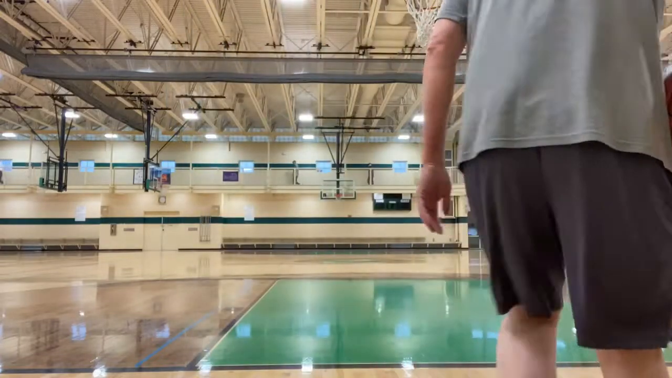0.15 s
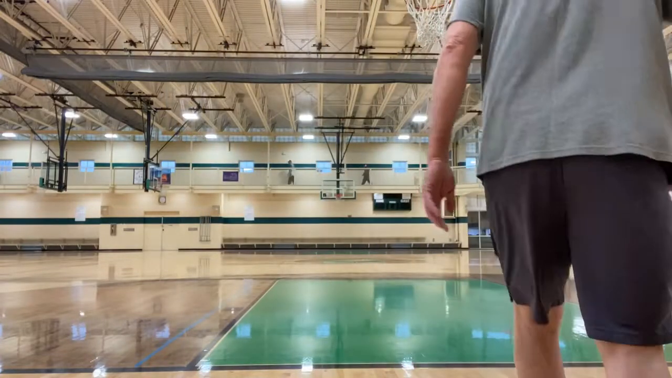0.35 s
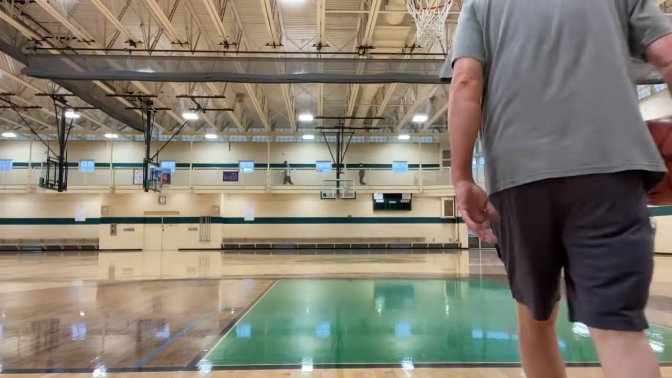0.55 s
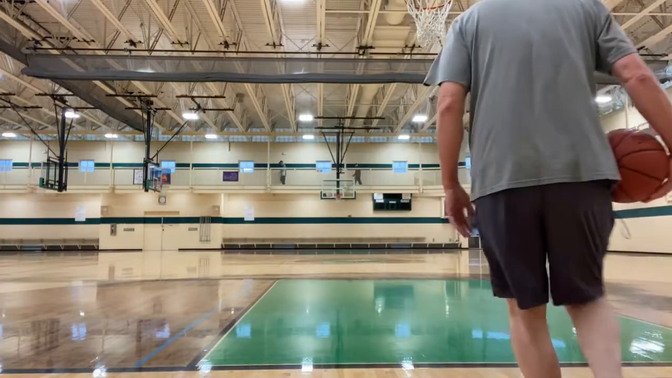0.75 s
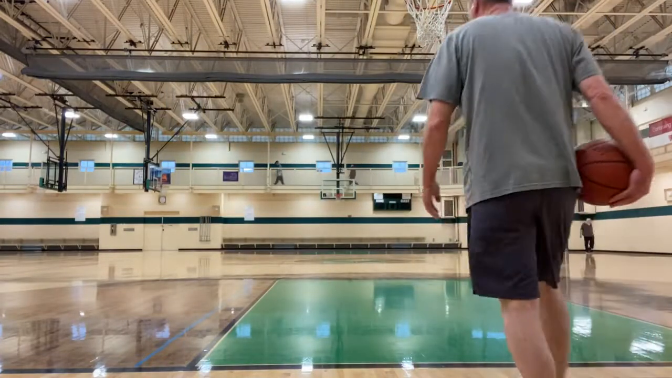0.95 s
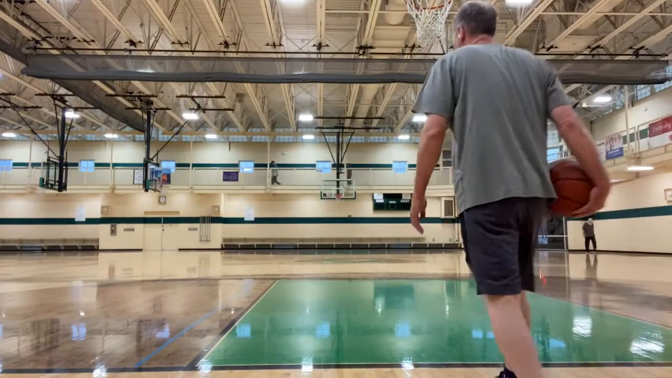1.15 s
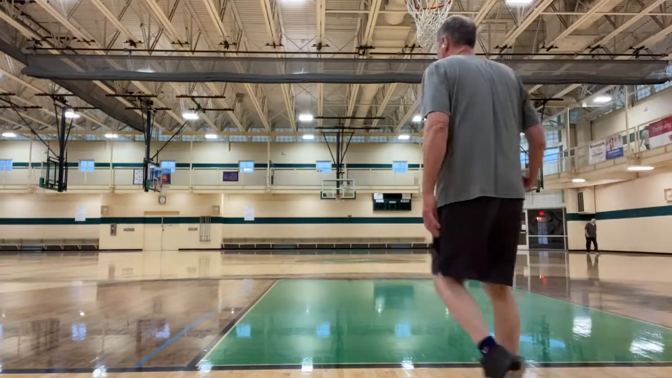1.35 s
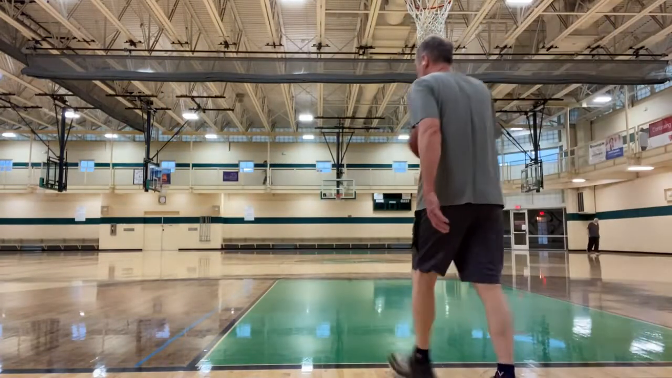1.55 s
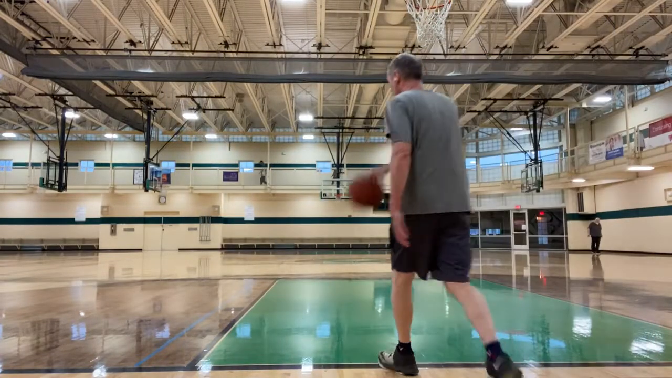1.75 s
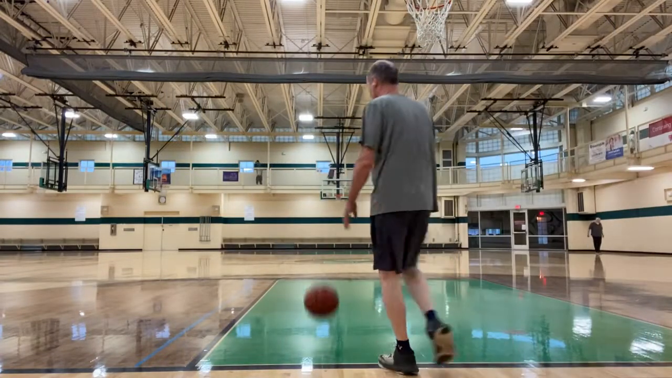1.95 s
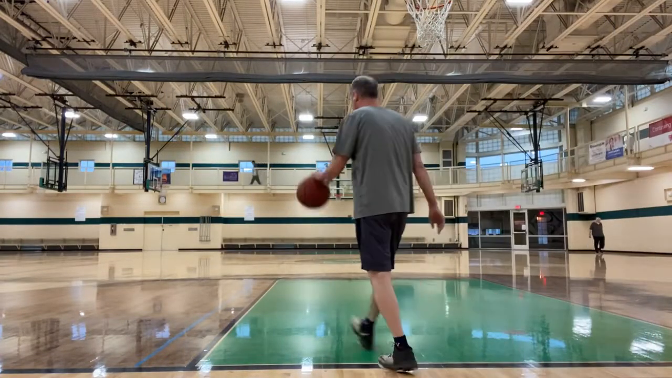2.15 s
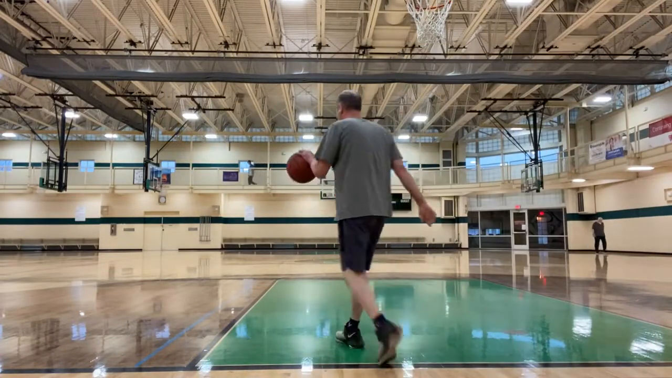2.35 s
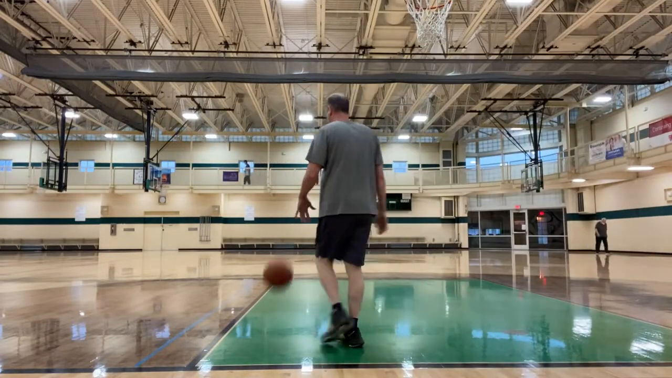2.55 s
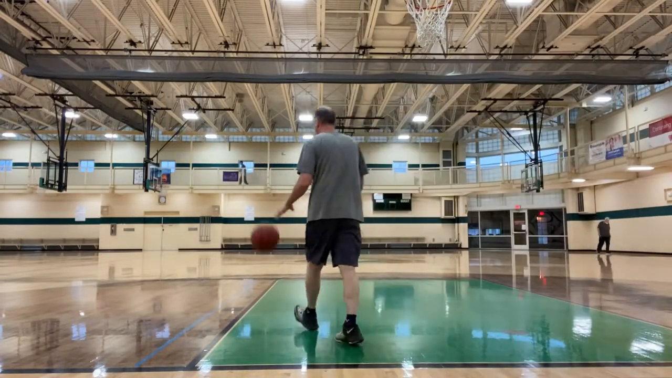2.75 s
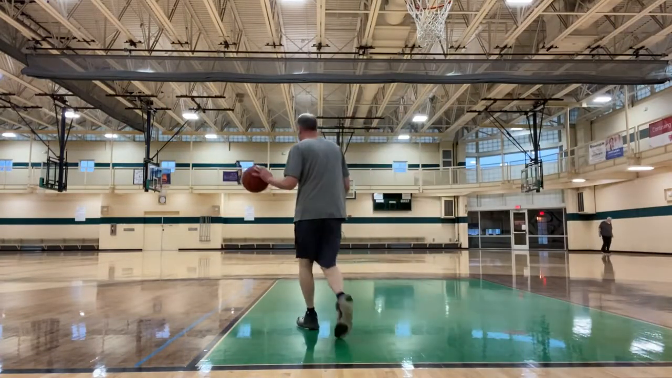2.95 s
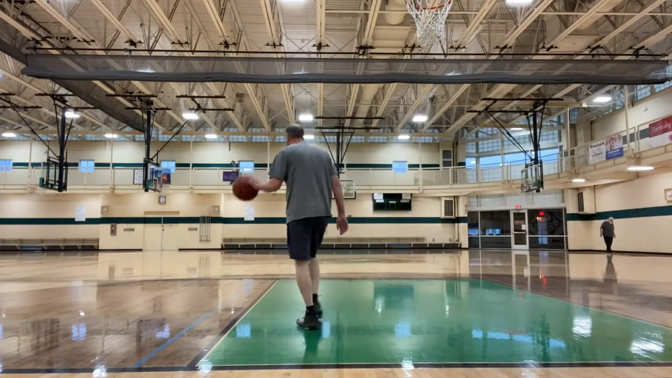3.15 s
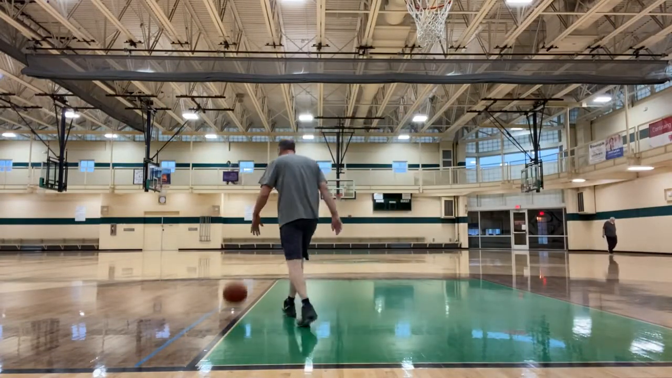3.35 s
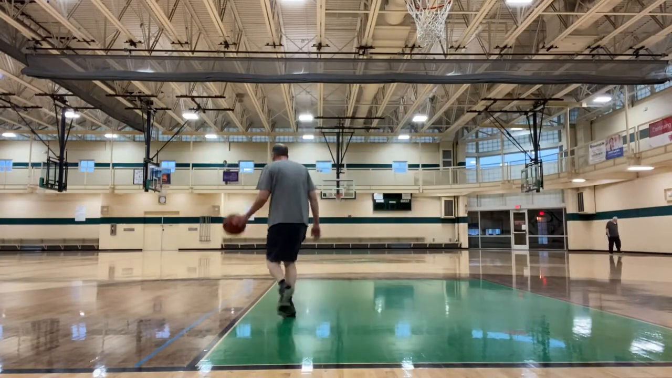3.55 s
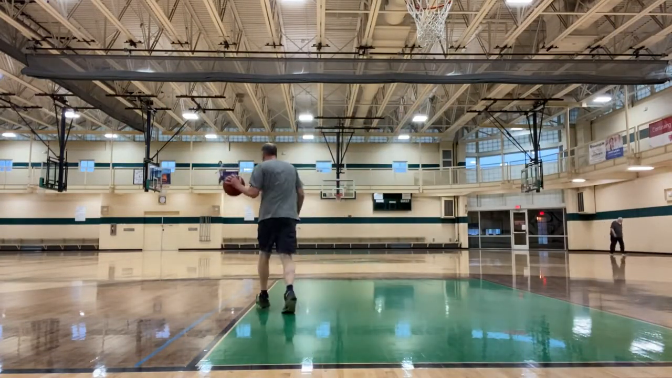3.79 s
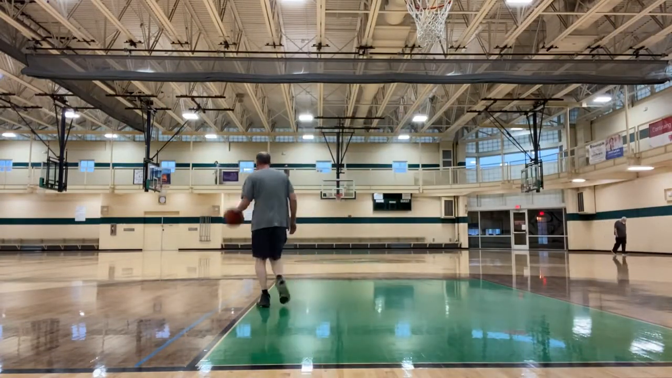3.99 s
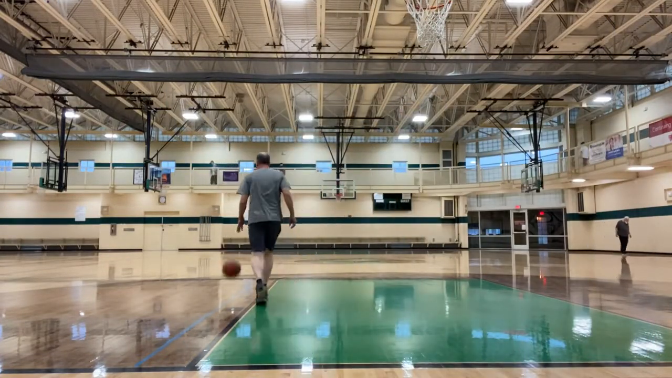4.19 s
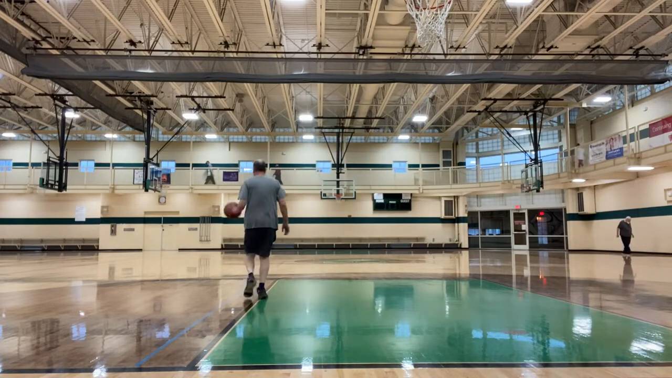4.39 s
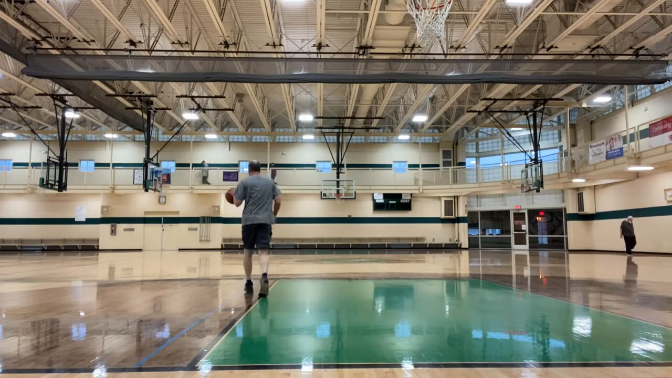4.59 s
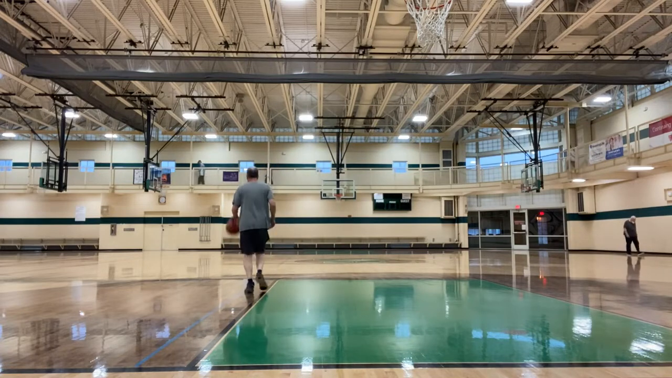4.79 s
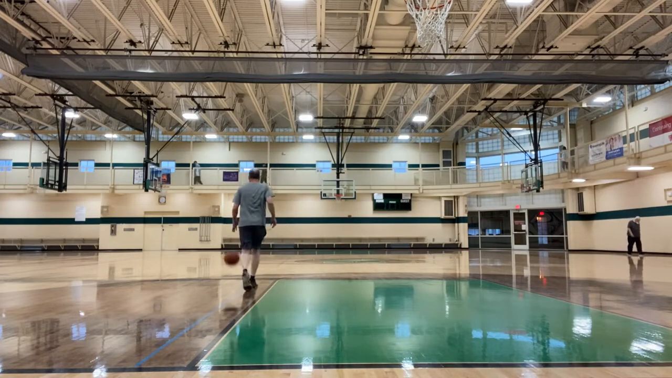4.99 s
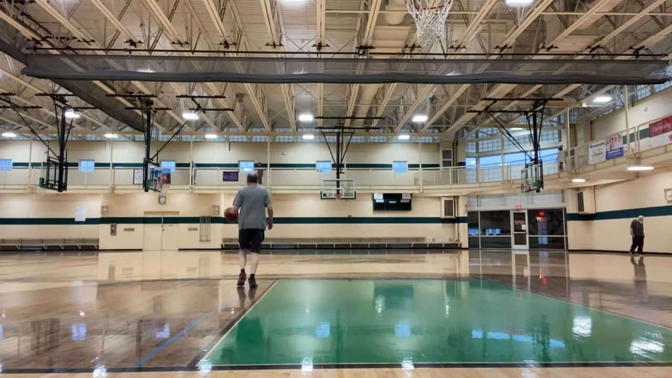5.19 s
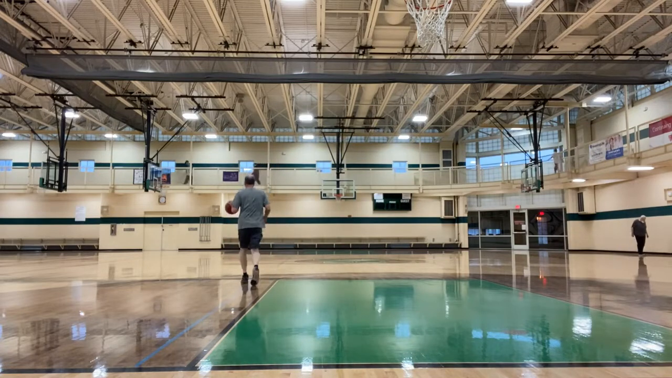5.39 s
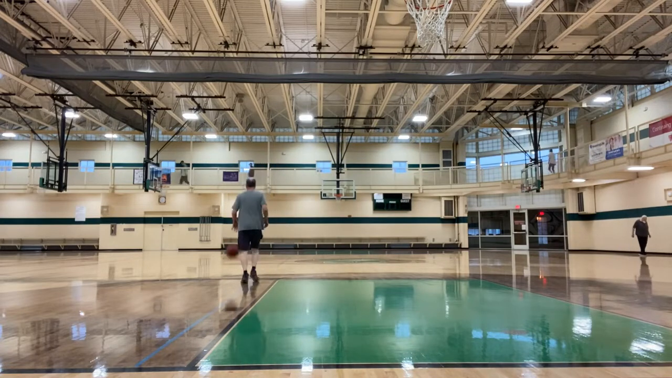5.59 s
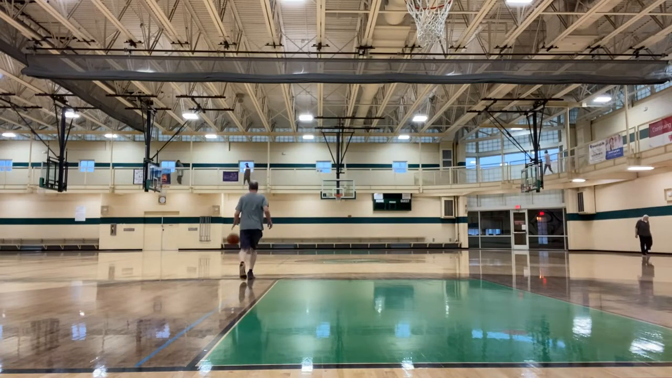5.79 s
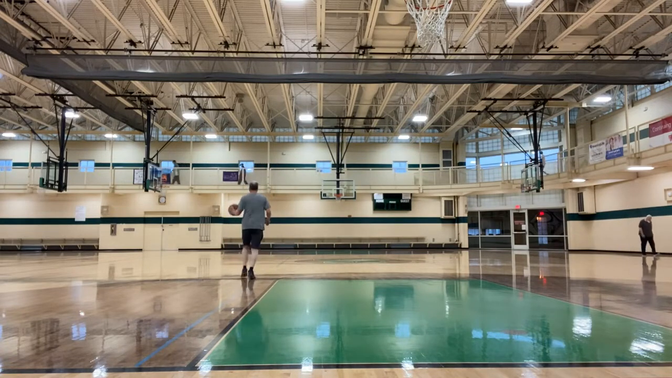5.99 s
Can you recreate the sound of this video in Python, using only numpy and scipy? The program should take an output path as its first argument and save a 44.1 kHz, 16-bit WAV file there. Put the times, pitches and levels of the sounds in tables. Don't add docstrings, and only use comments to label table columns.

```python
import sys
import numpy as np
from scipy import signal
from scipy.fft import rfft, irfft, next_fast_len
from scipy.io import wavfile
from scipy.ndimage import uniform_filter1d

SR = 44100
rng = np.random.default_rng(int(sys.argv[2]) if len(sys.argv) > 2 else 0)


def level_to_linear(level):
    exponent = np.asarray(level, float) / 20
    return 10 ** exponent


def digitize_waveform(pressure):
    field = np.atleast_2d(pressure).T
    bounded = np.clip(field, -1, 1)
    quanta = np.round(bounded * 32767).astype(np.int16)
    wavfile.write(sys.argv[1], SR, quanta)


N = 265923

# [t/s, slap level/dB, ball ring level/dB, board knock level/dB, floor thump level/dB]
BOUNCES = [
    (2.0133, -7, -14, -12, -9.5),
    (2.715, -7, -12.5, -19.5, -11.5),
    (3.4775, -9, -12, -18, -14),
    (4.2498, -15, -18, -17, -14.5),
    (5.014, -10.5, -20.5, -21, -13),
    (5.7491, -16, -16, -25, -16),
]
# [f/Hz, level/dB]
MID_COLOUR = [(25, 4.5), (6000, -1), (7200, -4.5), (8500, -0.5), (11500, -9), (12300, -18), (13300, -12),
              (13900, -11), (15700, -6), (16200, -18), (16900, -42)]


def evened(x):
    return x / np.sqrt(np.mean(x ** 2) + 1e-20)


def read(points, hz):
    f, value = np.transpose(points)
    return np.interp(np.log(hz + 1), np.log(f + 1), value)


def add(mix, s, sound):
    part = mix[round(s * SR):][:len(sound)]
    part += sound[:len(part)]


def diffuse(gain):
    # [f/Hz, level/dB]
    side_colour = [(25, -4), (7000, -0.5), (8700, -10.5), (9400, -29), (10200, -22), (10900, -11.5),
                   (13000, -8), (14500, -5), (15200, -19.5), (16900, -45)]
    # [f/Hz, side minus mid level/dB]
    width = [(60, -21), (100, -8.5), (160, -3), (270, -1.5), (450, 1), (740, 5), (1200, 2), (2000, 2),
             (3300, -1.5), (5500, 2), (9000, 7), (15000, -1.5)]
    size = next_fast_len(N)
    hz = np.fft.rfftfreq(size, 1 / SR)
    re, im = rng.standard_normal((2, 2, len(hz)))
    ports = level_to_linear(np.array([read(MID_COLOUR, hz), read(side_colour, hz) + read(width, hz)]))
    mid, side = irfft((re + 1j * im) * gain(hz) * ports, size)[:, :N]
    return np.array([mid + side, mid - side]) / np.sqrt(np.mean(mid ** 2))


def swell(t, hz, peak_s, order, turn, glide=0.):
    u = t / peak_s
    cycles = hz * (t - peak_s) * (1 + glide * (u - 1) / 2) + turn
    return (u * np.exp((1 - u ** 2) / 2)) ** order * np.cos(2 * np.pi * cycles)


def slap(seconds, colour_db):
    hz = np.fft.rfftfreq(512, 1 / SR)
    delay = 0.001165 + 0.58 * seconds * np.log2(16000 / (hz + 1000))
    later, size = rng.random((2, 4, 1))
    extra = (2 * size - 1) * np.exp(-2j * np.pi * hz * 4 * seconds * later)
    clicks = 1 + .4 * extra.sum(0)
    phase = 2 * np.pi * np.cumsum(delay) * hz[1]
    burst = irfft(clicks * level_to_linear(colour_db(hz)) * np.exp(-1j * phase))
    return burst / abs(burst).max()


def air():
    # [f/Hz, level per Hz/dB]
    vent = [(100, -8), (131, -20.5), (154, -24), (280, -22.5), (634, -26.5), (1180, -36), (2600, -39.5),
            (4500, -48), (7000, -64), (9500, -63.5), (12000, -69.5), (15000, -70), (17000, -89)]
    t = np.arange(N) / SR
    drift = evened(sum(np.sin(2 * np.pi * (f * t + rng.random())) / np.sqrt(f)
                       for f in np.geomspace(.3, 12, num=16)))
    hiss = diffuse(lambda f: level_to_linear(read(vent, f)) * f ** 4 / (f ** 4 + 132.0 ** 4))
    return level_to_linear(-29.5 - 9.0 + 1.0 * drift) * hiss


def rustle():
    # [t/s, level/dB, length/s]
    brushes = [(0.0, -67, 0.046), (.085, -66, .06), (.25, -80, .05), (0.414, -69, 0.033), (.53, -72, .03),
               (.65, -71, 0.072), (0.896, -70, 0.062), (1.02, -63.5, 0.12), (1.13, -66, 0.083),
               (1.202, -64, 0.069), (1.47, -66, .02), (1.57, -71, .06), (1.774, -67, 0.078),
               (1.876, -63.5, 0.074), (3.25, -74, .03), (3.865, -61.5, 0.07), (4.507, -62, .025)]
    rise_share = 0.21
    t = np.arange(N) / SR
    power = level_to_linear(-2 * 79.0)
    for s, db, seconds in brushes:
        rise = ((s - t) / (rise_share * seconds)) ** 2
        fall = 2 * (t - s) / seconds
        power = power + level_to_linear(2 * db) * np.exp(-np.where(t < s, rise, fall))
    grain = level_to_linear(2.5 * evened(uniform_filter1d(rng.standard_normal(N), size=150)))
    hiss = diffuse(lambda f: level_to_linear(-6 * (np.log2((f + 1) / 8500) / 0.83) ** 2))
    return np.sqrt(power) * evened(grain) * hiss


def steps():
    # [t/s, level/dB, f/Hz]
    footfalls = [(.03, -28, 113), (.09, -27, 60), (0.268, -32, 59), (0.489, -30.5, 120),
                 (0.619, -26.5, 65.6), (0.788, -24, 61), (1.222, -27, 59), (1.502, -31.5, 119),
                 (1.74, -30, 68), (1.845, -32, 76), (2.076, -15, 106), (2.272, -15, 71), (2.33, -15, 105),
                 (2.39, -14.5, 71.4), (2.512, -22, 70.6), (2.772, -8.5, 96), (2.939, -25, 67),
                 (3.058, -25, 99), (3.531, -14, 96.6), (3.901, -32, 74.5), (4.419, -22, 113),
                 (4.72, -26.5, 114), (4.858, -44, 68), (5.079, -27, 97), (5.148, -28, 131),
                 (5.249, -20.5, 101), (5.539, -21, 118), (5.63, -27, 71.5), (5.812, -26, 101)]
    rise_cycles = 3.5
    out = np.zeros(N)
    for (s, db, hz), turn in zip(footfalls, rng.random(len(footfalls))):
        peak_s = min(rise_cycles / hz, s)
        t = np.arange(0, 3 * peak_s, 1 / SR)
        add(out, s - peak_s, level_to_linear(db + 1.5) * swell(t, hz, peak_s, order=2, turn=turn))
    return out


def sway():
    # [low lobe level/dB, high lobe level/dB, far wall return t/s,
    # low return level/dB, high return level/dB]
    booms = [(-20, -21.5, .28, -21, -36), (-25, -20.5, 0.3, -31, -42), (-26, -23.5, 0.23, -28.5, -27.5),
             (-34.5, -26, 0.29, -27, -44), (-27.5, -20.5, 0.31, -23, -23),
             (-26.5, -27.5, 0.19, -24.5, -24.5)]
    rest_low_db, rest_high_db = -34.5, -37.5
    build_s, boom_t60_s, return_s = 0.032, 4.5, 0.057
    shudder_db, shudder_t60_s = 14.5, 0.32
    since = np.clip(np.arange(N) / SR - np.array(BOUNCES)[:, :1], 0, None)
    low_db, high_db, wall_s, back_low_db, back_high_db = np.transpose(booms)[:, :, None]
    boom = level_to_linear(-120 * since / boom_t60_s) + level_to_linear(2 * shudder_db - 120 * since / shudder_t60_s)
    boom *= (1 - np.exp(-(since / build_s) ** 2)) ** 2
    back = np.exp(-((since - wall_s) / return_s) ** 2)

    def level(rest_db, db, back_db):
        return np.sqrt(level_to_linear(2 * rest_db) + (level_to_linear(2 * db) * boom + level_to_linear(2 * back_db) * back).sum(0))

    def lobe(centre_hz, octaves):
        return diffuse(lambda f: level_to_linear(-6 * (np.log2((f + 1) / centre_hz) / octaves) ** 2))

    def steady(x):
        return evened(x / uniform_filter1d(x.mean(0) ** 2, size=2200) ** 0.12)

    low = steady(lobe(67.2, 0.33))
    high = steady(lobe(113.2, 0.42))
    out = level(rest_low_db, low_db, back_low_db) * low
    out += level(rest_high_db, high_db, back_high_db) * high
    return out + level_to_linear(-41) * lobe(42, 0.62)


def hall():
    # [f/Hz, starting level/dB, t60/s, build-up/s]
    bands = [(171.5, -22, 3.16, 0.0072), (386, -32.5, 2.53, 0.004), (633, -35.5, 1.06, 0.0009),
             (950, -41.5, 1.5, 0.0056), (1450, -38.5, 2.64, 0.0079), (2200, -42.5, 2.7, 0.01),
             (2960, -42.5, 1.8, 0.0085), (5000, -46, 1.66, 0.00061), (7000, -55, 1.4, 0.013),
             (9640, -49, 0.8, 0.033), (11800, -62, 0.49, 0.0066), (15000, -63, .45, .005)]
    # [level/dB, brightness/(dB per octave), ring of the ball/dB,
    # its lowest ring/dB, strength of early reflections]
    answers = [(-2.5, 0.5, -4, 2, 24), (-3, 1, 3, -6, 17), (-6, 1, 4, -2, 6.5), (-6, 0, -0.5, 3.5, 3.4),
               (-2.5, 1.5, 1, -4.5, 0.59), (-6.5, 0.5, -1, 4, 0.92)]
    early_above_hz = 175
    out, centres = np.zeros((2, N)), np.array(bands)[:, 0]
    t = np.arange(0, N / SR + .01, .001)
    since = np.clip(t - np.array(BOUNCES)[:, :1], 0, None)
    answer_db, bright_db, ring_db, low_ring_db, early = np.transpose(answers)[:, :, None]
    clumps = evened(uniform_filter1d(rng.standard_normal((len(t), len(bands))), size=12, axis=0))
    for k, (centre, db, t60, build) in enumerate(bands):
        share = np.c_[np.r_[130, centres, 16800], np.r_[0, np.arange(len(bands)) == k, 0]]
        start_db = answer_db + bright_db * np.log2(centre / 1500)
        start_db += ring_db * np.exp(-np.log2(centre / 2300) ** 2)
        start_db += low_ring_db * np.exp(-(np.log2(centre / 1450) / 0.3) ** 2)
        power = level_to_linear(2 * (start_db - 60 * since / t60)) * (1 - np.exp(-since / build)) ** 2
        treble = centre ** 2 / (centre ** 2 + early_above_hz ** 2)
        reflections = early * treble * np.exp(-since / 0.02)
        far_wall = 0.11 * np.exp(-((since - .15) / 0.027) ** 2)
        power *= 1 + reflections + far_wall
        level = level_to_linear(db + 2.14 * clumps[:, k]) * np.sqrt(power.sum(0))
        out += np.interp(np.arange(N) / SR, t, level) * diffuse(lambda hz: np.sqrt(read(share, hz)))
    return out


def ticks():
    # [t/s, level/dB, brightest f/Hz]
    clicks = [(0.4095, -45, 7000), (1.1277, -33, 8000), (1.1492, -38, 6000), (1.224, -43, 9000),
              (2.0267, -27, 7000), (4.3744, -44, 11000), (5.0771, -18.5, 6000), (1.1973, -31.5, 5000)]
    out = np.zeros(N)
    for s, db, bright_hz in clicks:
        def colour_db(hz):
            return -4.0 * np.log2((hz + 50) / bright_hz) ** 2 + read(MID_COLOUR, hz)
        add(out, s - .0005, level_to_linear(db + 2.5) * slap(0.00023, colour_db))
    return out


def echoes():
    # [t/s, level/dB, f/Hz, length/s]
    returns = [(2.17, -40, 1500, .02), (2.73, -23, 2530, .004), (2.789, -35, 2280, .012),
               (2.883, -36.5, 2270, .012), (3.498, -31, 1410, .006), (3.561, -41, 2400, .015),
               (3.647, -38, 1750, .015), (3.831, -42, 2200, .02), (4.2615, -24, 1220, 0.0022),
               (4.384, -35, 1590, 0.0068), (5.0275, -25.5, 1350, .005), (5.056, -30, 2000, .008),
               (5.079, -21, 5340, .002), (5.091, -34, 3540, .015), (5.149, -38.5, 1920, .015),
               (5.791, -35, 2120, .006), (5.811, -31, 5840, .003), (5.884, -33.5, 1405, .012),
               (5.942, -41, 1450, .025), (2.727, -25, 3850, .003), (2.735, -20, 563, 0.011),
               (1.0, -52, 5200, .004)]
    out = np.zeros(N)
    for s, db, hz, seconds in returns:
        t = np.arange(0, 4 * seconds, 1 / SR)
        blur = sum(swell(t, hz * (1 + 0.126 * a), seconds * (1 + 0.5 * b), order=2, turn=c)
                   for a, b, c in rng.uniform(-1, 1, (5, 3)))
        add(out, s - seconds, level_to_linear(db - 5.5) * blur)
    return out


def ball_ring(t, bright_db):
    # [f/Hz, level/dB, t60/s]
    modes = [(1064, 2.5, 0.025), (1432, 2, 0.034), (1750, -2, 0.037), (2200, 5, 0.012), (2850, -26.5, 0.11),
             (3200, -34, 0.011), (4180, -12, 0.026)]
    ring = np.zeros(len(t))
    for (hz, db, t60), (a, b) in zip(modes, rng.uniform(-1, 1, (len(modes), 2))):
        level_db = db + bright_db * np.log2(hz / 1600) - 60 * t / t60
        ring += level_to_linear(level_db) * np.sin(2 * np.pi * hz * (1 + 0.055 * a) * t + 4.0 * b)
    ring *= 1 - np.exp(-t / 0.000047)
    late = np.r_[np.zeros(round(.0105 * SR)), ring][:len(t)]
    return ring + level_to_linear(-9.5) * late


def board_knock(t, knock_hz, board_db):
    knock = swell(t, knock_hz, 0.00824, order=2, turn=0.92, glide=-0.16)
    knock += level_to_linear(board_db) * swell(t, 235.5, 0.01066, order=2, turn=0.34)
    return knock + level_to_linear(-16.5) * swell(t, 500, 0.00414, order=1, turn=0.072)


def floor_thump(t, thump_s):
    thump = swell(t, 99.3, thump_s, order=2, turn=0.39)
    return thump + level_to_linear(-7) * swell(t, 81.4, 0.039, order=1, turn=0.66)


def bounces():
    # [f/Hz, level/dB]
    skin = [(1500, -14), (3000, -3), (6000, 0), (8500, -4), (10500, -6), (12500, -12), (15000, -10),
            (16300, -14), (16900, -60)]
    # [slap brightness/(dB per octave), knock f/Hz, lower board mode level/dB,
    # ring brightness/(dB per octave), thump peak t/s]
    shades = [(-7, 328, -6, -2.5, 0.0222), (-6, 333, -2, -2.5, 0.0207), (-5.5, 312, -28, 7.5, 0.0216),
              (-3, 323, -19, -2, 0.0193), (-0.5, 333, 2.5, 10, 0.0197), (-1.5, 336, -10, -1.5, 0.0207)]
    out, t = np.zeros(N), np.arange(SR // 5) / SR
    for bounce, shade in zip(BOUNCES, shades):
        s, slap_db, ring_db, knock_db, thump_db = bounce
        tilt_db, knock_hz, board_db, bright_db, thump_s = shade

        def colour_db(hz):
            return read(skin, hz) + tilt_db * np.log2((hz + 50) / 6000)

        body = level_to_linear(ring_db - 4.0) * ball_ring(t, bright_db)
        body += level_to_linear(knock_db + 8.0) * board_knock(t, knock_hz, board_db)
        body += level_to_linear(thump_db + 5.0) * floor_thump(t, thump_s)
        add(out, s - .0004, level_to_linear(slap_db + 3.5) * slap(0.0002414, colour_db))
        add(out, s + 0.0035, level_to_linear(slap_db - 16.5) * slap(0.00063, colour_db))
        add(out, s + 0.0015, body)
    return out


def scene():
    # [f/Hz, lag/cycles]
    port_turns = [(0, 0), (4600, .5), (9700, 1), (12800, 1.5), (15600, 2), (22050, 3)]
    direct = bounces() + ticks() + echoes()
    size = next_fast_len(N)
    turns = np.interp(np.fft.rfftfreq(size, 1 / SR), *np.transpose(port_turns))
    late = irfft(rfft(direct, size) * np.exp(-2j * np.pi * turns), size)[:N]
    return np.array([direct, late]) + hall() + sway() + rustle() + air() + steps()


def band_limit(x):
    return signal.sosfilt(signal.butter(12, 16850, fs=SR, output="sos"), x)


def record(dry):
    # [start t/s, end t/s]
    drops = [(1.12755, 1.14882), (1.17025, 1.19737)]
    left_db = 1.93
    x = dry * level_to_linear(np.array([[left_db / 2], [-left_db / 2]]))
    x = x / (1 + (x / .93) ** 6) ** (1 / 6)
    for start, end in drops:
        x[:, round(start * SR):round(end * SR)] = 0
    return band_limit(x)


dry = scene()
out = record(dry)
digitize_waveform(out)
```